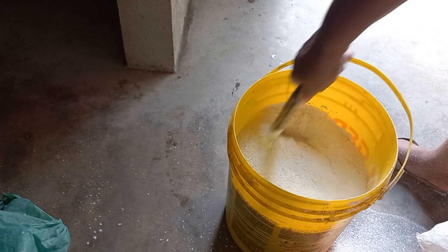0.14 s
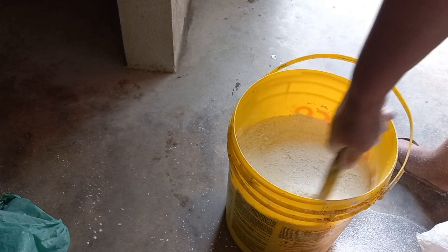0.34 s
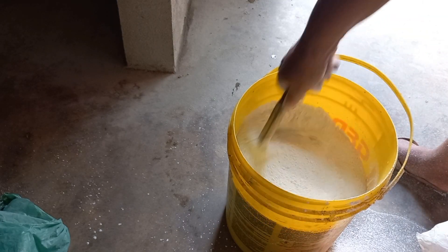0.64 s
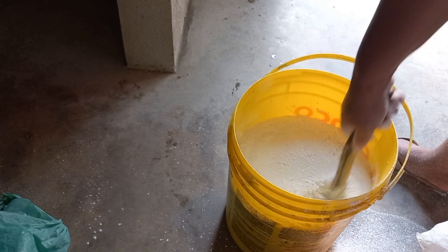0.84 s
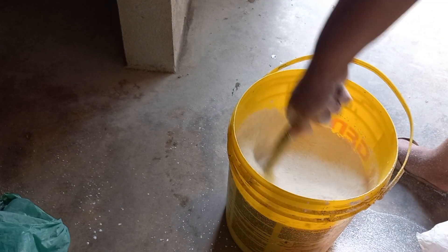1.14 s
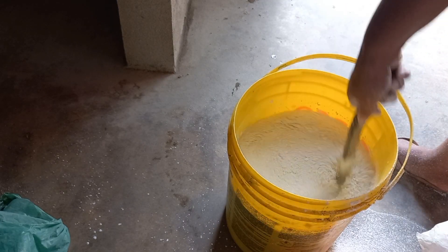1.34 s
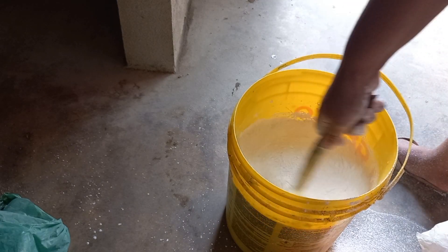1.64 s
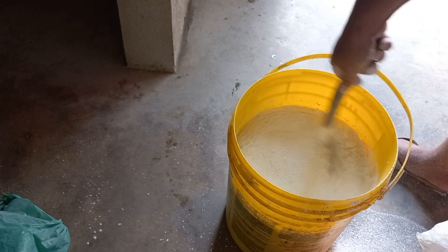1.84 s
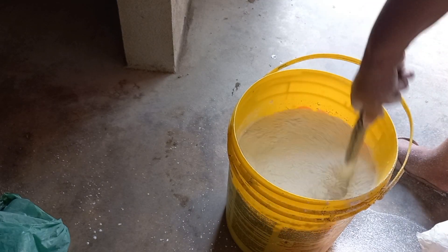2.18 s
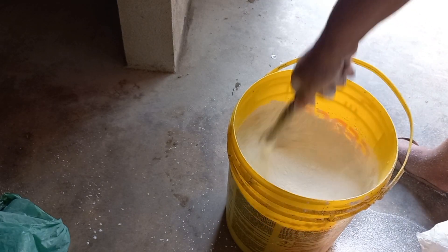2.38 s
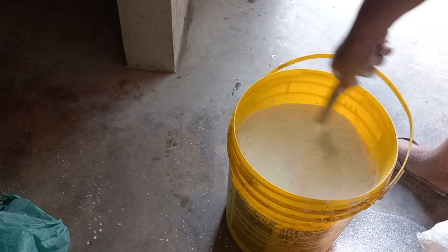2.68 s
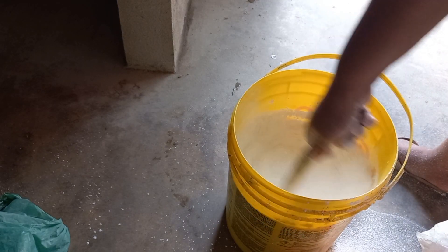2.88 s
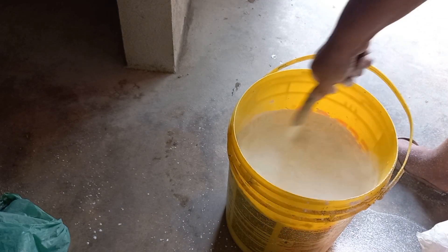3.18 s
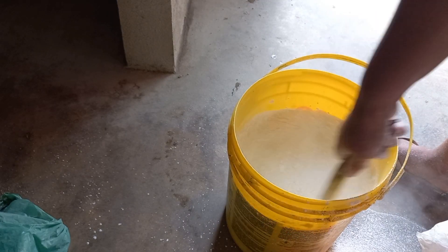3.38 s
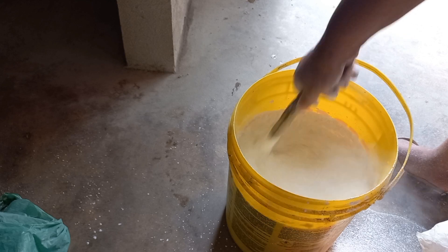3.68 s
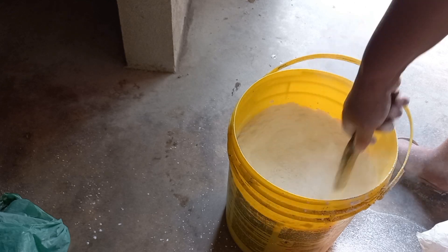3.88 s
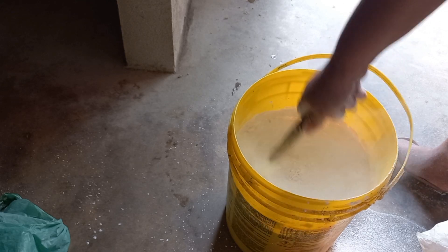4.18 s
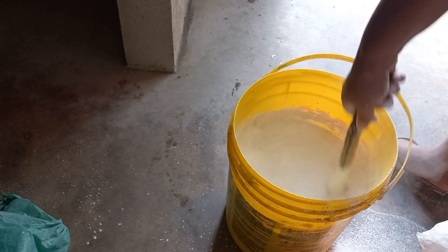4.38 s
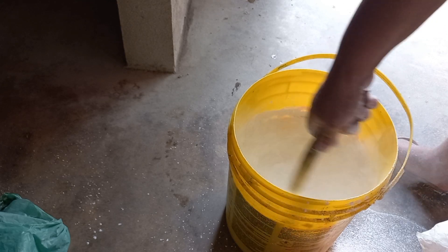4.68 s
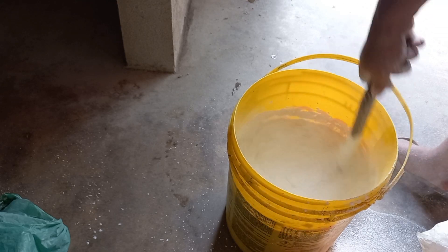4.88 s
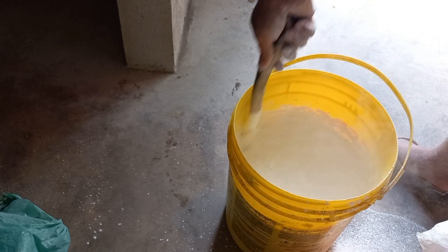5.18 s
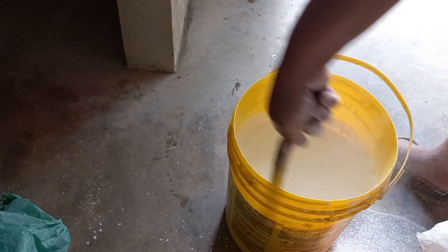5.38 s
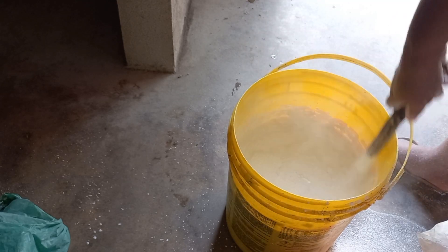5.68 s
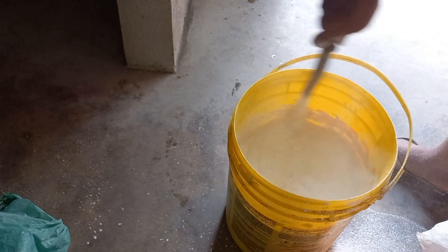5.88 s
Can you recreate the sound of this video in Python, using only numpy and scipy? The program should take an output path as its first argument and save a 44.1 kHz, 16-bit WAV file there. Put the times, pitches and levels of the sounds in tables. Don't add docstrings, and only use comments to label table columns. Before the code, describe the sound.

Close, uneven stirring in a plastic bucket: dull hollow bumps, gloopy sloshing and popping air pockets, brief rumbles of draught, soft hiss behind.

```python
import sys
import numpy as np
from scipy import signal
from scipy.fft import rfft, irfft, next_fast_len
from scipy.io import wavfile
from scipy.ndimage import map_coordinates

SR = 44100
rng = np.random.default_rng(int(sys.argv[2]) if len(sys.argv) > 2 else 0)


def file_out(sig):
    cols = np.atleast_2d(sig).T
    lim = np.clip(cols, -1, 1)
    pcm = np.round(lim * 32767).astype(np.int16)
    wavfile.write(sys.argv[1], SR, pcm)


def level_to_linear(level):
    exponent = np.asarray(level, float) / 20
    return 10 ** exponent


N = 266112

# peak time in seconds, peak level in dB, pitch in Hz.
BLOWS = [(0.744, -33, 387), (0.772, -34.5, 360), (0.896, -33.5, 468), (1.011, -18.5, 442), (1.08, -35, 456),
         (1.472, -23.5, 454), (1.904, -16, 422), (1.96, -27, 415), (1.974, -34, 417), (2.284, -20, 430),
         (2.325, -35, 467), (2.47, -32.5, 403), (2.606, -33, 372), (2.91, -32, 350), (2.927, -19.5, 350),
         (2.944, -26.5, 362), (2.962, -25.5, 360), (4.09, -21, 406), (4.171, -26, 402), (4.253, -26.5, 433),
         (5.848, -36, 430)]
# peak time in seconds, peak level in dB, pitch in Hz.
NUDGES = [(0.0162, -41.5, 553), (0.052, -43, 525), (0.2839, -46, 426), (0.586, -42.5, 520),
          (0.698, -43, 510), (0.7912, -40, 362), (0.813, -46, 344), (1.046, -32.5, 350),
          (1.0687, -35.5, 446), (1.1284, -43.5, 540), (1.1832, -53, 437), (1.2188, -44, 422),
          (1.3464, -41, 452), (1.783, -41.5, 494), (1.8122, -43.5, 516), (1.972, -39, 441),
          (2.017, -43, 398), (2.204, -43, 388), (2.2048, -43, 567), (2.509, -39.5, 376), (2.57, -43.5, 323),
          (3.097, -43.5, 383), (3.1352, -45, 390), (3.207, -44, 390), (3.3698, -43, 366),
          (3.4096, -47, 377), (3.439, -46, 390), (4.6833, -40, 390), (4.755, -43, 368), (5.887, -37, 402)]
# peak time in seconds, peak level in dB, pitch in Hz,
# width in ms.
COLUMN_SWELLS = [(0.941, -39, 467, 12), (1.023, -22, 427, 19.5), (1.484, -25.5, 411, 21),
                 (1.921, -18.5, 407, 15), (2.05, -33.5, 401, 18), (2.297, -26, 426, 14),
                 (2.356, -36.5, 455, 21), (2.371, -43, 430, 12), (2.455, -32, 392, 18),
                 (2.877, -35.5, 376, 20), (3.33, -35, 376, 12.4), (3.787, -36, 373, 21),
                 (3.84, -26.5, 395, 33.6), (4.103, -14.5, 416, 16.5), (4.118, -19, 395, 16),
                 (4.136, -23, 395, 15.7), (4.262, -19.5, 381.4, 20.4), (4.325, -32, 386, 12.7),
                 (4.542, -23, 406, 10), (4.558, -19, 400, 21), (4.576, -23.5, 395, 11),
                 (4.661, -34.5, 381, 17), (2.978, -33.5, 370, 23), (5.034, -41.5, 383, 16),
                 (5.813, -31.5, 400, 13), (5.825, -35.5, 413, 9.6), (5.841, -36, 413, 14),
                 (5.873, -32, 409, 17)]
# frequency in Hz, level in dB, t60 in seconds.
WALL_MODES = [(224.4, -15, 0.095), (296.7, -23, 0.22), (468, -14.5, 0.11), (520, -19.5, 0.15)]
# start in seconds, length in seconds, wall drag in dB, slosh in dB.
STROKES = [(0.0, 0.042, -48, -44.5), (.11, 0.14, -52, -51), (.29, 0.11, -49, -49.5),
           (.37, 0.25, -49.5, -44.5), (.738, 0.062, -44, -49), (.89, 0.051, -46, -49.5),
           (.98, 0.17, -45.5, -48), (1.21, 0.086, -48.5, -48), (1.47, 0.06, -43.5, -50.5),
           (1.6, 0.09, -50, -53.5), (1.8, 0.25, -46.5, -47), (2.03, 0.088, -45.5, -55),
           (2.2, 0.17, -43, -46), (2.43, 0.061, -46, -49), (2.53, 0.1, -50, -40),
           (2.68, 0.12, -51.5, -50.5), (2.85, 0.089, -43, -51.5), (3.15, 0.032, -46, -46.5),
           (3.31, 0.15, -46, -47.5), (3.55, 0.2, -53.5, -61), (3.77, .15, -46, -56),
           (4.09, 0.047, -39.5, -47), (4.25, 0.049, -38, -43.5), (4.535, 0.13, -43.5, -47),
           (4.78, 0.054, -60, -51.5), (5.2, 0.07, -54.5, -78), (5.5, 0.098, -53.5, -54.5),
           (5.68, 0.074, -52.5, -71), (5.8, 0.12, -41.5, -51.5), (5.95, 0.058, -59, -72)]
# frequency in Hz, width in Hz, level in dB.
BUCKET_MODES = [(242.6, 40.4, -7.5), (300.5, 30, -7.5), (395, 38, -1), (481.7, 30, -5.5), (512.8, 41, -5)]
# frequency in Hz, width in Hz, level in dB.
POCKET_MODES = [(945, 200, 8), (1190, 8.4, 8), (1390, 160, 3.5), (1716, 350, 10), (2330, 530, 7.5),
                (3740, 1850, 5.5)]
# peak time in seconds, peak level in dB, pitch in Hz.
SLAPS = [(0.0248, -31, 1390), (0.013, -33, 756), (0.1289, -33.5, 970), (0.3677, -34, 1140),
         (0.4311, -26.5, 1450), (0.4958, -23, 1670), (0.5345, -31.5, 1530), (0.5542, -29.5, 1720),
         (0.5773, -29.5, 1410), (0.7367, -31.5, 1600), (0.9943, -22, 1550), (1.0062, -22.5, 1670),
         (1.8096, -33, 960), (1.8775, -25, 1430), (1.8964, -34, 1140), (1.9044, -23.5, 890),
         (1.9738, -30, 1120), (2.2805, -31.5, 1340), (2.5818, -16, 1820), (2.587, -24, 1390),
         (2.5978, -25, 1050), (3.1644, -39, 1530), (4.0884, -16.5, 1440), (4.2497, -29.5, 1440),
         (4.5577, -28.5, 920), (5.801, -33, 1650)]
# peak time in seconds, peak level in dB, pitch in Hz.
GULPS = [(0.2177, -43, 930), (0.3166, -37, 1160), (0.3918, -32.5, 1860), (0.3961, -33, 1190),
         (0.54, -31.5, 1560), (0.8432, -34.5, 1700), (0.988, -32, 2020), (1.0366, -31, 1740),
         (1.2236, -35.5, 1280), (1.6733, -42.5, 1220), (1.7224, -34, 1213), (4.657, -40, 945),
         (4.666, -40.5, 930), (4.345, -47, 1480), (4.33, -41.5, 1640), (4.262, -37.5, 960),
         (0.515, -42, 1590), (0.565, -45, 1350), (5.768, -48, 1650), (5.772, -54, 980), (4.985, -48, 1620),
         (4.03, -51.5, 1170), (4.16, -45.5, 1040), (1.9195, -36, 1350), (1.9688, -34, 1290),
         (2.104, -35, 1190), (2.202, -35.5, 1850), (2.4915, -33, 1240), (2.5422, -27.5, 1200),
         (2.5624, -24.5, 1390), (2.5722, -21.5, 1300), (2.6883, -32, 1560), (2.7429, -37.5, 1310),
         (3.2232, -38, 1670), (3.8269, -42.5, 1190), (4.4805, -43, 1640), (4.5393, -29.5, 1640),
         (4.6861, -39, 1830), (5.8663, -35.5, 1600), (5.8746, -41.5, 920)]
# peak time in seconds, peak level in dB, pitch
# in Hz.
POPS = [(0.0444, -46, 1617), (0.0753, -41, 1600), (0.1132, -41, 1396), (0.1462, -44, 1300),
        (0.1581, -49, 1396), (0.3033, -48, 1139), (0.3537, -46, 1065), (0.3811, -38, 1617),
        (0.4205, -37.8, 1680), (0.437, -32.5, 1470), (0.4834, -37, 1450), (0.6166, -47, 1370),
        (0.7513, -54, 1506), (0.7737, -46, 1090), (0.8102, -36, 1617), (0.8122, -42, 1065),
        (0.8256, -43, 1170), (0.8321, -41.8, 1764), (0.9059, -42, 1150), (1.0217, -38, 1720),
        (1.0835, -44, 1200), (1.127, -49, 1160), (1.109, -48, 1270), (1.2397, -46, 1860),
        (1.2661, -41.5, 1760), (1.3429, -46, 1210), (1.5026, -44, 1075), (1.7031, -49, 1290),
        (1.8313, -41, 890), (1.8423, -47, 1396), (1.8548, -39, 1610), (1.8628, -42, 930),
        (2.0793, -45, 1350), (2.1606, -43, 1650), (2.1611, -39.5, 1110), (2.2634, -48, 1300),
        (2.2723, -39, 1680), (2.2958, -38.5, 2205), (2.2963, -41, 1240), (2.3292, -40, 2120),
        (2.3571, -40.5, 1727), (2.5248, -40.4, 1249), (2.5302, -40, 1837), (2.637, -54, 1396),
        (2.6375, -43.5, 875), (2.6869, -47.5, 860), (2.7138, -45, 1670), (3.1648, -42.5, 920),
        (3.1793, -44.6, 2241), (3.3484, -43.5, 910), (3.4157, -40.5, 1740), (4.2558, -36.5, 1530),
        (4.607, -38, 960), (4.6105, -40, 2180), (4.6185, -46, 1020), (4.6415, -46, 960),
        (4.7996, -44.5, 1280), (5.4017, -46, 1730), (5.8023, -43, 1010)]
# frequency in Hz, density in dB per Hz.
SPRAY_SPECTRUM = [(500, -50), (900, 15), (2300, 6), (4200, 1), (9000, -13.5), (16000, -54)]
# peak time in seconds, peak level in dB, pitch
# in Hz.
SPITS = [(1.0827, -39, 2600), (4.105, -39, 2160), (2.2, -37, 3080), (2.505, -42, 3100), (2.5938, -36, 3470),
         (3.1906, -39, 2600), (3.6, -45, 2240), (3.3524, -38.5, 3000), (3.3922, -41, 3140),
         (4.302, -42, 2500), (4.292, -44, 2100), (3.7, -43, 2350), (2.572, -28, 2100), (2.601, -35, 2260),
         (2.617, -37, 2300), (0.32, -42, 2530), (0.541, -38, 2150), (2.432, -46.5, 1950),
         (5.808, -42, 1900),
         (0.0818, -49, 2706), (0.1792, -45.5, 2340), (0.5173, -49.2, 2856), (0.9995, -47, 5540),
         (1.0002, -43, 4380), (1.9017, -57, 2856), (2.0149, -52, 2780), (2.0846, -45, 2893),
         (2.195, -46, 2270), (2.205, -44, 4220), (2.329, -46, 6550), (2.2419, -45, 2505),
         (2.266, -44, 2555), (2.5258, -43, 4100), (2.6335, -49, 3107), (2.633, -42, 4600),
         (2.645, -50.0, 4009), (3.1806, -41, 2300), (3.305, -48.4, 3357), (3.5045, -51, 3457),
         (4.0648, -47, 2770), (4.0727, -49.0, 3808), (4.072, -47.5, 6113), (4.2498, -58, 3507),
         (4.284, -45, 2405), (4.6, -52, 2600)]
# peak time in seconds, peak level in dB, pitch in Hz.
SNAPS = [(0.63, -36, 6500), (1.0, -40, 8290), (1.49, -36, 6500), (2.202, -30, 2600), (3.1645, -33, 2300),
         (4.0727, -38, 4500), (2.169, -40, 3500), (2.277, -41, 5800), (2.2915, -40, 11500),
         (2.2995, -33, 7400), (2.301, -39, 10800), (4.096, -35, 3700), (2.5957, -27, 10900),
         (4.0882, -24, 3000), (4.0953, -32, 7600), (4.538, -30, 3300), (5.7075, -35, 10000)]
# frequency in Hz, t60 in seconds.
ROOM_T60 = [(300, 0.51), (2000, 0.068), (12000, 0.16)]
# peak time in seconds, peak level in dB, width in ms,
# push (+1) or suck (-1).
PUFFS_LEFT = [(2.237, -32, 23, -1), (2.301, -30.5, 10, 1), (2.336, -36, 22, 1), (2.564, -26, 7.9, 1),
              (2.615, -16, 14.2, 1), (2.73, -34, 13, -1), (2.775, -21, 17.5, -1), (2.805, -28.5, 10, 1),
              (2.857, -35.5, 21, 1), (2.889, -32, 16, -1), (4.766, -35, 21, -1), (5.155, -56, 54, -1),
              (5.468, -33, 7.4, 1), (5.498, -25, 19, 1), (5.869, -43, 16, -1), (5.908, -22.5, 5, 1),
              (5.941, -29.5, 4.7, -1), (5.996, -30, 5.2, -1), (6.019, -29, 16, 1)]
# peak time in seconds, peak level in dB, width in ms,
# push (+1) or suck (-1).
PUFFS_RIGHT = [(1.259, -29, 10.3, 1), (1.324, -41, 20, -1), (2.227, -36, 19, 1), (2.282, -37, 11, 1),
               (2.319, -28.5, 15.5, -1), (2.565, -28.5, 41, -1), (2.607, -19, 34.6, 1),
               (2.635, -27, 7.8, 1), (2.717, -33, 8, 1), (2.78, -23, 19.5, 1), (2.888, -37, 28, -1),
               (4.767, -35, 16, -1), (5.155, -50, 31, -1)]
# start in seconds, length in seconds, left level in dB, right level in dB.
GUSTS = [(0.0, 0.086, -68, -64), (.57, 0.047, -76, -61), (.81, 0.041, -49.5, -51),
         (1.25, 0.095, -54, -52.5), (1.45, 0.17, -62, -63), (1.82, 0.036, -56, -52.5),
         (1.9, 0.083, -56, -55), (2.22, 0.15, -53, -48.5), (2.52, 0.46, -49, -47), (3.58, 0.075, -72, -54),
         (3.7, 0.24, -69, -58), (3.92, 0.08, -66, -57), (4.08, 0.078, -57, -58), (4.19, 0.027, -52, -51),
         (4.55, 0.17, -65, -67), (4.74, 0.076, -51, -54), (5.14, 0.12, -57.5, -58.5),
         (5.33, 0.042, -56.5, -62), (5.44, 0.11, -47.5, -68), (5.58, 0.15, -48.5, -74),
         (5.82, 0.29, -44.5, -60)]
# frequency in Hz, density in dB per Hz.
DRAUGHT_SPECTRUM = [(15, -35), (40, -13), (70, 2), (105, 0), (160, -11), (300, -10), (600, -37),
                    (1200, -120)]
# frequency in Hz, rms level in dB.
HUM_OVERTONES = [(240, -69.5), (360, -62), (480, -65.5)]
# peak time in seconds, peak level in dB, pitch in Hz, width in ms.
WHINES = [
    (3.7, -59, 955, 55),
    (5.16, -65, 1180, 130),
    (5.36, -68, 1690, 100),
    (5.34, -68, 1310, 120),
    (5.45, -61, 1320, 90),
    (5.53, -64, 950, 40),
    (5.72, -61, 950, 150),
]
# frequency in Hz, density in dB per Hz.
HISS_SPECTRUM = [(350, 2), (720, -1), (3000, 3), (5000, 3.5), (7400, 2.5), (8300, -0.5), (12000, 2),
                 (15700, -1.5)]
# start in seconds, length in seconds, hiss level in dB.
OPENINGS = [(0.0, 0.2, -64), (.38, 0.34, -64.5), (.8, 0.062, -62.5), (.95, 0.13, -58.5), (1.33, 0.012, -59),
            (1.47, 0.25, -58.5), (1.9, 0.24, -57), (2.28, 0.044, -57), (2.35, 0.15, -61.5),
            (2.56, 0.093, -57), (2.7, 0.11, -57.5), (2.96, 0.045, -56.5), (3.1, 0.1, -56.5),
            (3.22, 0.23, -53), (3.65, 0.21, -57), (4.08, 0.23, -57), (4.43, 0.047, -57.5),
            (4.58, 0.089, -55.5), (4.78, 0.12, -59), (5.0, 0.084, -56.5), (5.17, 0.15, -62.5),
            (5.47, 0.09, -57.5), (5.78, 0.058, -60), (5.93, 0.089, -55.5)]

BLOW_MS, NUDGE_MS, SPIT_MS, SNAP_MS = 5.5, 12.55, 4.3, 0.33
SLAP_CYCLES, GULP_CYCLES, POP_CYCLES = 2.26, 6.2, 6.3
PUFF_HZ, PUFF_SLOWS = 161, 0.19
LEFT_LAG_SAMPLES, FLOOR_LAG_SAMPLES = 4, 140
BAND_LIMIT_HZ = 15790


def unit(x):
    return x / np.sqrt(np.mean(x ** 2, axis=-1, keepdims=True) + 1e-20)


def along(points, hz):
    point_hz, value = np.transpose(points)
    return np.interp(np.log(hz + 1), np.log(point_hz + 1), value)


def wobble(rate_hz):
    knots = rng.standard_normal(int(N * rate_hz / SR) + 4)
    return map_coordinates(knots, [np.arange(N) * rate_hz / SR])


def filtered(x, response):
    size = next_fast_len(N + SR // 2)
    spectrum = rfft(x, size) * response(np.fft.rfftfreq(size, 1 / SR))
    return irfft(spectrum, size)[..., :N]


def resonances(modes):
    def response(hz):
        total = 0
        for k, (centre_hz, width_hz, db) in enumerate(modes):
            damping = 1j * hz * width_hz
            total = total + (-1) ** k * level_to_linear(db) * damping / (centre_hz ** 2 - hz ** 2 + damping)
        return total
    return response


def spells(rows, rest_db, rise_db_s, fall_db_s):
    hop = 64
    t = np.arange(0, N + hop, hop) / SR
    power = level_to_linear(rest_db) ** 2
    for start_s, length_s, *db in rows:
        before = rise_db_s * np.maximum(start_s - t, 0)
        after = fall_db_s * np.maximum(t - start_s - length_s, 0)
        power = power + level_to_linear(np.subtract.outer(db, before + after)) ** 2
    return np.repeat(np.sqrt(power), hop, axis=1)[:, :N]


def bursts(rows, skew, glide, flat, size, column_hz=None, wander=0):
    peak_s, db, hz, ms, *push = np.transpose(rows)[:, :, None]
    step = np.arange(-size, 2 * size)
    u = step / SR / (ms / 1000)
    shape = np.exp(-np.abs(u * np.where(u < 0, 2 * skew, 2 / skew)) ** flat)
    start = (push[0] < 0) / 2 if push else rng.random(peak_s.shape)
    if column_hz:
        start = column_hz * peak_s
    bend = glide + wander * np.cos(2 * np.pi * start)
    turns = hz * step / SR * (1 + bend * np.tanh(u)) + start
    tone = level_to_linear(db) * shape * np.cos(2 * np.pi * turns)
    at = np.clip(np.round(peak_s * SR).astype(int) + step, 0, N)
    return np.bincount(at.ravel(), tone.ravel(), N + 1)[:N]


def bumps():
    wall, t = np.zeros(N + SR), np.arange(SR // 5) / SR
    rows = [(*blow, BLOW_MS) for blow in BLOWS] + [(*nudge, NUDGE_MS) for nudge in NUDGES] + COLUMN_SWELLS
    onset = 1 - np.exp(-t / 0.014)
    for peak_s, db, _, ms in rows:
        ring = 0
        for mode_hz, mode_db, t60_s in WALL_MODES:
            decay = level_to_linear(mode_db + rng.normal(0, 3) - 60 * t / t60_s)
            ring = ring + decay * np.sin(2 * np.pi * mode_hz * rng.normal(1, .025) * t)
        first = max(round((peak_s - .4 * ms / 1000) * SR), 0)
        wall[first:][:len(t)] += level_to_linear(db) * ring * onset
    column = bursts(rows, skew=1.57, glide=-0.018, flat=1.43, size=2600, column_hz=401.8)
    return column + wall[:N]


def stirring():
    drag_gain, slosh_gain = spells(STROKES, rest_db=[[-62], [-68]], rise_db_s=800, fall_db_s=150)
    rub = level_to_linear(2.6 * wobble(45)) * rng.standard_normal((2, N))
    drag = unit(filtered(rub[0] + rub, resonances(BUCKET_MODES)))
    chance = rng.random((4500, 4))
    peak_s = chance[:, 0] * N / SR
    level_db = 8 * chance[:, 1] ** 3
    pitch_hz = 880 * level_to_linear(8.5 * chance[:, 2] ** 1.3)
    width_ms = 1.6 + 6.5 * chance[:, 3] ** 2
    swarm = np.c_[peak_s, level_db, pitch_hz, width_ms]
    pockets = unit(bursts(swarm, skew=1.85, glide=0.031, flat=1.13, size=420, wander=.06))
    rush = rng.standard_normal((2, N))
    clumps = level_to_linear(1.8 * wobble(38))
    slosh = unit(filtered(clumps * (.85 * pockets + rush[0] + rush), resonances(POCKET_MODES)))
    return level_to_linear(-2.5) * drag_gain * drag, level_to_linear(-6.5) * slosh_gain * slosh


def in_cycles(table, cycles):
    return [(peak_s, db, hz, 1000 * cycles / hz) for peak_s, db, hz in table]


def gulps():
    slaps = bursts(in_cycles(SLAPS, SLAP_CYCLES), skew=1.5, glide=.03, flat=1.4, size=500, wander=.06)
    rows = in_cycles(GULPS, GULP_CYCLES) + in_cycles(POPS, POP_CYCLES)
    pockets = bursts(rows, skew=1.15, glide=.025, flat=1.4, size=500, wander=.06)
    tones = slaps + pockets * (1 + .15 * wobble(420))
    spray = unit(filtered(rng.standard_normal(N), lambda hz: level_to_linear(along(SPRAY_SPECTRUM, hz))))
    decay = level_to_linear(-60 * np.arange(4000) / SR / 0.026)
    settling = signal.fftconvolve(np.abs(tones), decay)[:N]
    return tones + level_to_linear(-47) * settling * spray


def spits():
    drop_rows = [(*drop, SPIT_MS) for drop in SPITS]
    drops = bursts(drop_rows, skew=0.72, glide=0.063, flat=4.4, size=300)
    snaps = bursts([(*snap, SNAP_MS) for snap in SNAPS], skew=0.53, glide=0, flat=1.7, size=100)
    return drops * (.9 + 0.45 * wobble(1100)) + snaps


def room(x):
    hz, t, z = signal.stft(rng.standard_normal((2, SR // 2)), SR, nperseg=256)
    spread = np.clip(hz / 900, .45, 1.2)[:, None]
    z = z[0] + spread * np.array([z[1], -z[1]])
    decay = level_to_linear(-60 * t / along(ROOM_T60, hz)[:, None])
    tail = signal.istft(z * decay, SR, nperseg=256)[1]
    delayed = np.pad(x, (200, 0))[None]
    return signal.fftconvolve(delayed, tail / np.linalg.norm(tail[0]), axes=1)[:, :N]


def puffs(table):
    rows = [(peak_s, db, PUFF_HZ / ms ** PUFF_SLOWS, ms, push) for peak_s, db, ms, push in table]
    return bursts(rows, skew=1.43, glide=0.027, flat=5.3, size=2200)


def draught():
    swirl_db = 4.3 * np.array([wobble(18), wobble(13)])
    eddies = level_to_linear(swirl_db) * rng.standard_normal((2, N))
    bed = unit(filtered(eddies, lambda hz: level_to_linear(along(DRAUGHT_SPECTRUM, hz))))
    gust_gain = spells(GUSTS, rest_db=-72.0, rise_db_s=1200, fall_db_s=680)
    return gust_gain * level_to_linear(2.5) * bed + np.array([puffs(PUFFS_LEFT), puffs(PUFFS_RIGHT)])


def hum():
    t = np.arange(N) / SR
    steady = 0
    for hz, db in HUM_OVERTONES:
        gain = level_to_linear(db + 2.0 + 2.7 * wobble(3.11))
        steady = steady + gain * np.sin(2 * np.pi * hz * t + 1.1 * wobble(22))
    whines = bursts(WHINES, skew=1.15, glide=0.006, flat=2.5, size=9000)
    return steady + whines * (.85 + .35 * wobble(60))


def hiss():
    white = rng.standard_normal((2, N))
    noise = unit(filtered(white, lambda hz: level_to_linear(along(HISS_SPECTRUM, hz)) * (hz > 150)))
    top = filtered(noise, lambda hz: np.clip(hz / 5000 - 1.6, 0, 1))
    noise = noise + (np.linspace(-.22, .3, N) + .13 * wobble(40)) * top
    gain = spells(OPENINGS, rest_db=-62.5, rise_db_s=81, fall_db_s=150)
    flutter = level_to_linear(2.5 + 1.4 * wobble(35) + 0.87 * wobble(70))
    return gain * flutter * level_to_linear([[-1.1], [1.1]]) * noise


def scene():
    drag, slosh = stirring()
    knocks, wet, fine = bumps(), gulps(), spits()
    bucket = (knocks + wet + fine + drag + slosh) * level_to_linear([[-.7], [.7]])
    bucket = np.array([np.roll(bucket[0], LEFT_LAG_SAMPLES), bucket[1]])
    deep = .13 * knocks
    floor = level_to_linear(-15.5) * np.roll(knocks, FLOOR_LAG_SAMPLES) * [[1], [-1]]
    echo = level_to_linear(-2.5) * room(deep + wet + 0.99 * fine)
    return bucket + floor + echo + draught() + hum() + hiss()


def roll_off(x):
    return signal.sosfilt(signal.butter(12, 16670, fs=SR, output="sos"), x)


def record(dry):
    mix = filtered(dry, lambda hz: hz < BAND_LIMIT_HZ)
    return roll_off(mix)


dry = scene()
out = record(dry)
file_out(out)
```